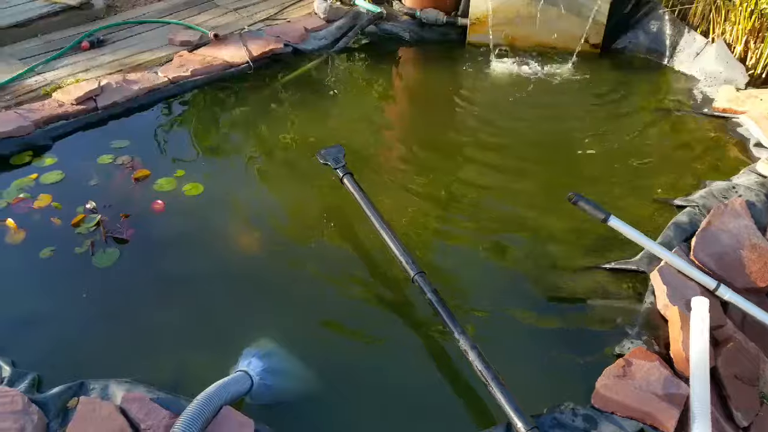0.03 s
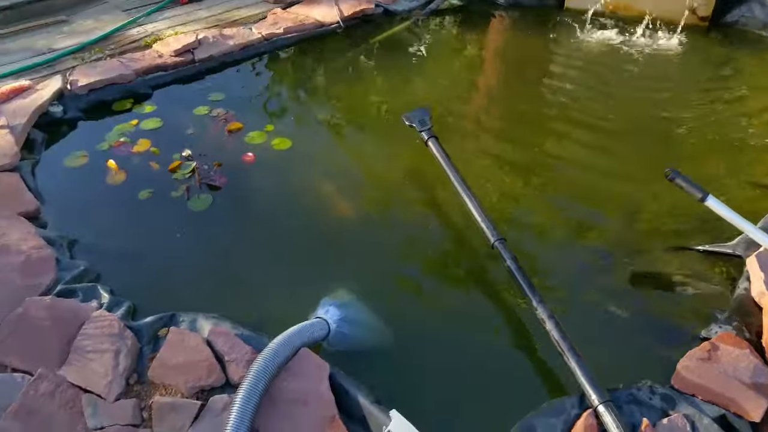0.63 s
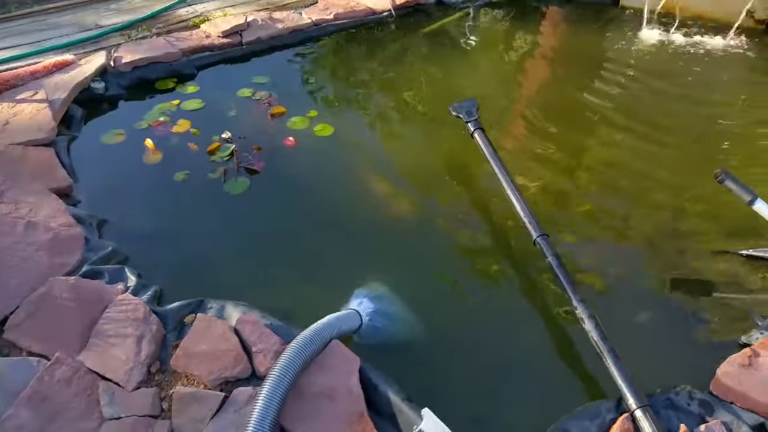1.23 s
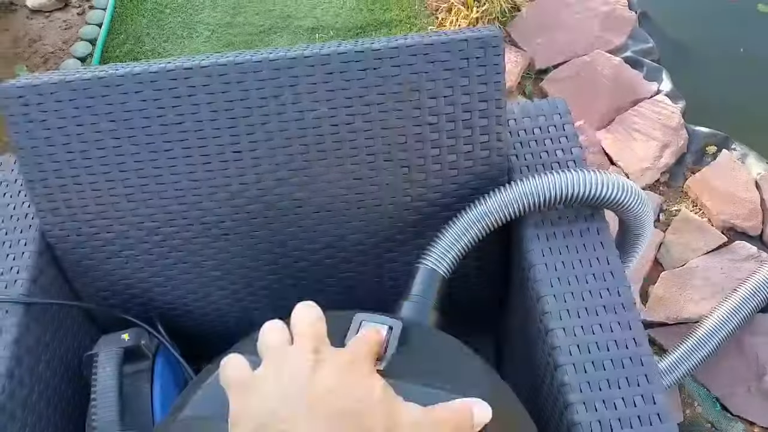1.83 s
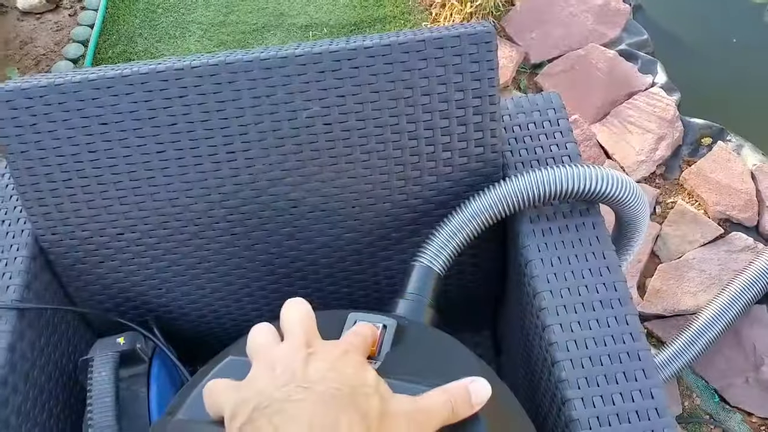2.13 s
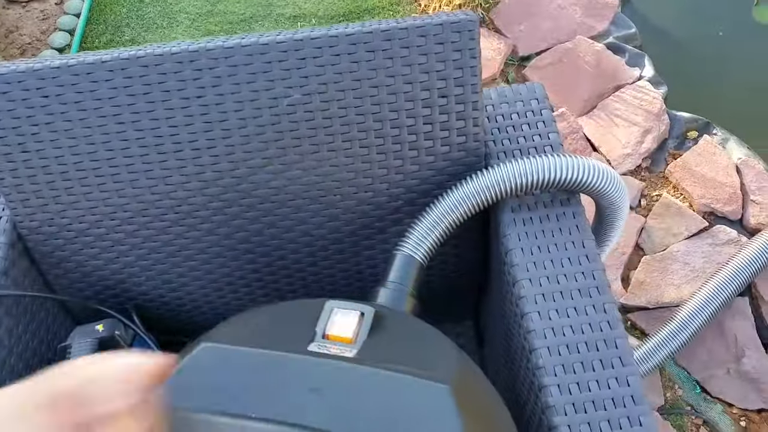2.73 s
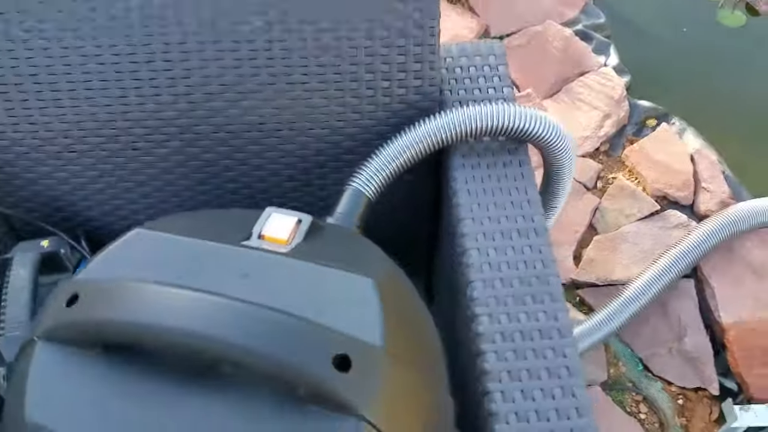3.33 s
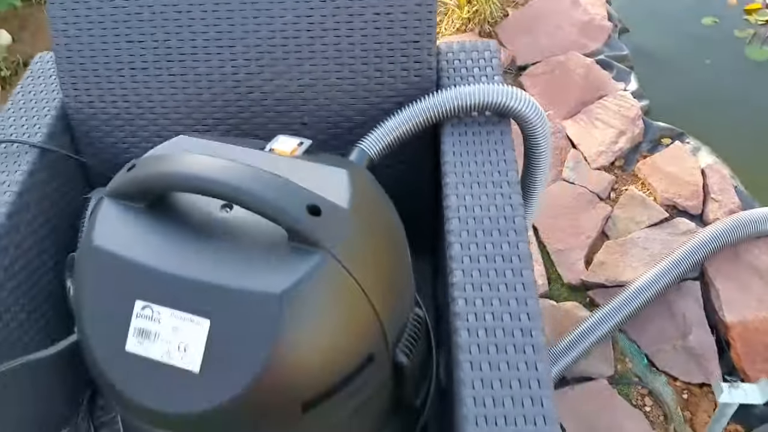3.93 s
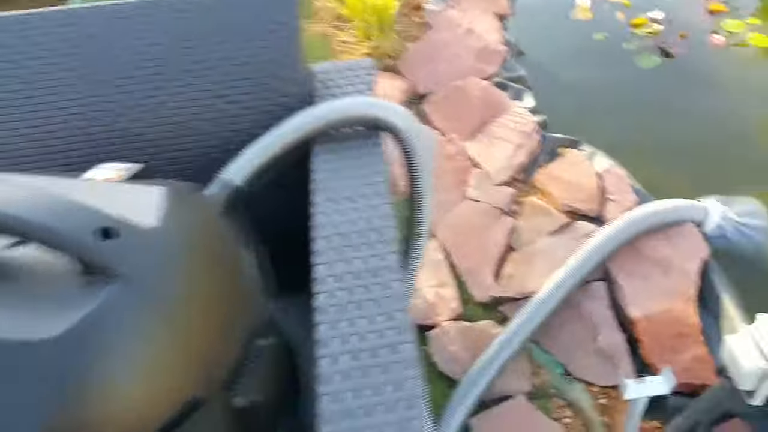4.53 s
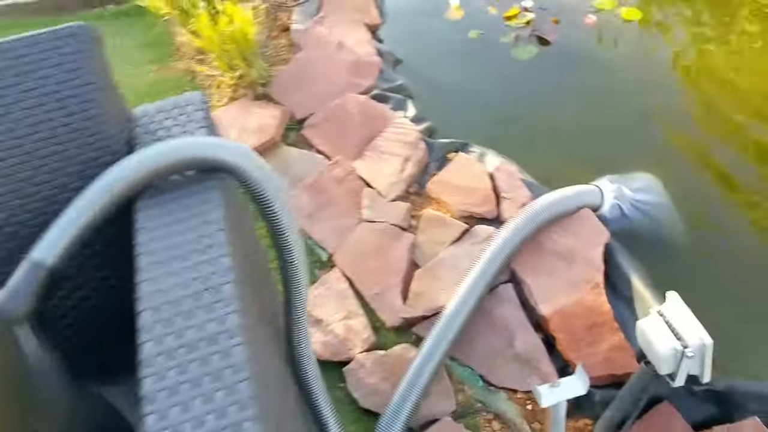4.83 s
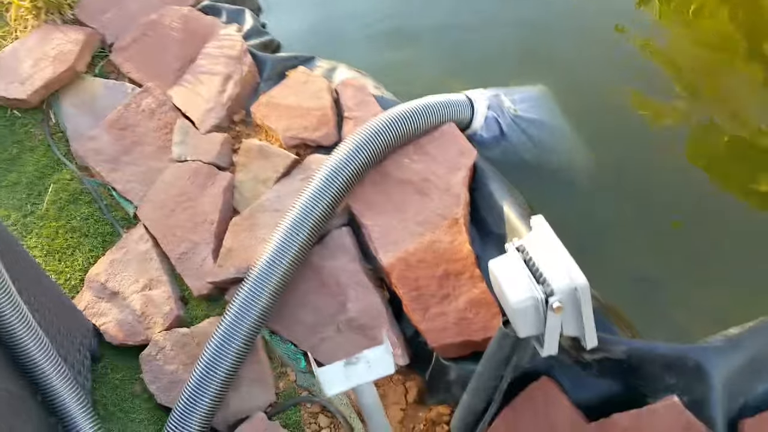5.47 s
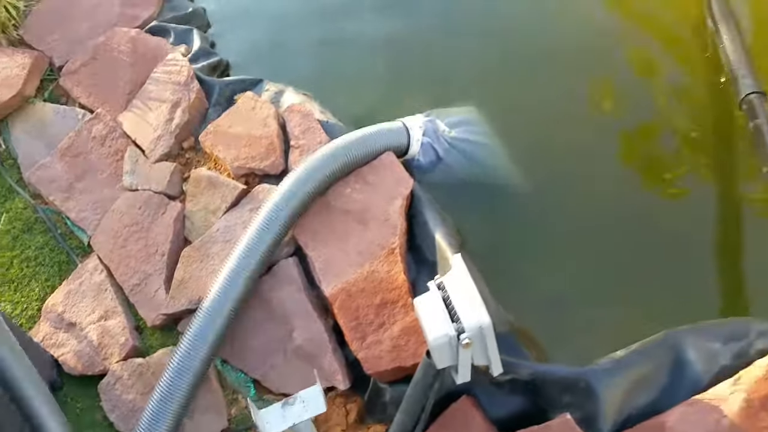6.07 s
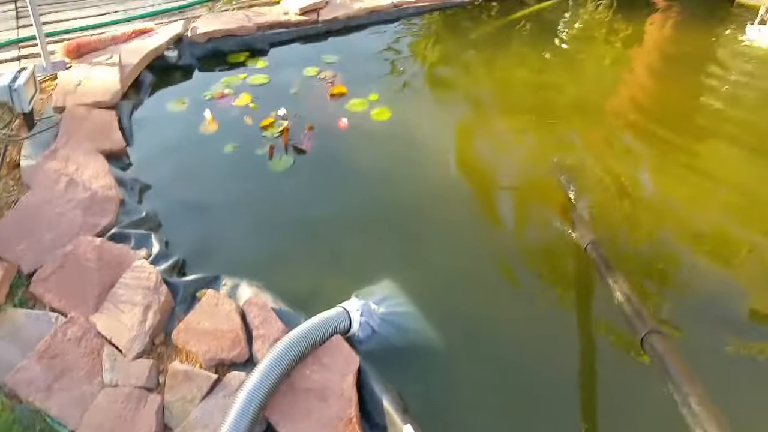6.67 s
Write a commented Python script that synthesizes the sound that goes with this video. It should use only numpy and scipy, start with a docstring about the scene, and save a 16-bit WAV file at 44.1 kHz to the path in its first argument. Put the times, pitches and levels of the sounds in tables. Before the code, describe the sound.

Soft trickling water and light plastic taps, until a vacuum motor spins up into a loud, humming roar that gradually turns duller.

```python
"""Water trickles into a garden pond, each bubble ringing as a damped oscillator. From 1.7 s a hand
fumbles on the plastic lid of a pond vacuum, exciting its modes, and the water abruptly sounds narrower.
At 3.26 s the motor starts with a growl; shaft hum and fan whine glide up with its speed, and turbulent
air roars through tank and hose. Meanwhile a hand-held phone with two microphone ports turns from the
machine towards the pond, out of the treble beam of the vents, and the roar grows duller."""
import sys
import numpy as np
from scipy import signal
from scipy.fft import rfft, irfft
from scipy.io import wavfile
from scipy.ndimage import map_coordinates

SR = 44100
rng = np.random.default_rng(int(sys.argv[2]) if len(sys.argv) > 2 else 0)


def dump_mix(stems):
    """Bounce the given channels to the path in sys.argv[1] as a 16-bit WAV at rate SR."""
    frames = np.atleast_2d(stems).T  # one column per channel
    limited = np.clip(frames, -1, 1)  # hard clip at full scale
    pcm = np.round(limited * 32767).astype(np.int16)
    wavfile.write(sys.argv[1], SR, pcm)


N = 295470
TIME = np.arange(N) / SR
FREQ = np.maximum(np.arange(N // 2 + 1) * SR / N, 1)

# water spectra before and after the change at 1.77 s, of the wash and of the burble: frequency_hz, gain_db
POND_SPECTRUM = [(45, -33), (96, -19), (135, -27), (210, -2.5), (260, -2.5), (365, -14), (445, -3.5),
                 (620, -16), (820, -9.5), (1600, -6), (1880, -3.5), (2150, -3.5), (2800, -7), (4300, -16),
                 (7000, -17), (14400, -25)]
NARROW_SPECTRUM = [(45, -22), (100, -31), (160, -18), (225, -3.5), (370, -4), (465, 6), (620, -14.5),
                   (1500, -4.5), (1950, -6), (2230, -1.5), (2450, -4), (3050, -7.5), (4000, -7), (6000, -22),
                   (10000, -19.5), (14400, -25.5)]
WASH_SPECTRUM = [(500, 1.5), (900, 4.3), (15000, 14.3)]
BURBLE_SPECTRUM = [(20, 20), (500, -1), (750, 10)]
# larger bubbles: start_s, level_db, pitch_hz
LARGE_BUBBLES = [(0.043, -33, 2000), (0.172, -36, 250), (.198, -37.5, 810), (0.208, -32, 1350),
                 (0.235, -32, 1900), (.25, -33, 238), (.314, -36, 820), (0.413, -32, 260),
                 (0.418, -32.5, 1940), (.49, -33, 1890), (.516, -34, 2260), (.625, -34.5, 836),
                 (.641, -33, 1500), (.651, -30, 1650), (1.027, -35.5, 234), (1.205, -37, 1820),
                 (1.241, -35, 1050), (1.297, -37, 1900), (1.44, -35.5, 1120), (1.534, -36, 1000)]
# single drops: start_s, level_db, pitch_hz
DROP_IMPACTS = [(.125, -44, 7200), (.316, -44, 7500), (.35, -45, 9000), (.819, -42, 7100),
                (.884, -41, 10000), (1.141, -43, 9000)]

# modes of the plastic lid: pitch_hz, t60_s, gain_db
LID_MODES = [(1940, 0.07, -1), (2320, 0.13, -4), (2400, 0.26, -4.5), (2660, 0.081, -3.5), (3690, 0.034, -6)]
# ticks on the lid, from fingers and, from 3.24 s, from the motor switching on: start_s, strength_db,
# crack_offset_db, thud_offset_db
LID_TICKS = [(1.671, -50, 9, -10), (1.75, -48, 9, -10), (1.777, -39, -26, 3), (1.899, -32, -18, -5),
             (2.134, -28.5, -4, -3.5), (2.258, -33, -24, -27), (2.38, -31.5, -19, -8),
             (2.508, -29.5, -22, -6), (2.709, -33, -14, -18), (2.814, -36.5, -6, 1), (2.836, -40, -2, -8),
             (2.923, -30, -22, -12), (3.097, -36, -18, -12), (3.161, -38, -5, -4), (3.24, -35, -16, -10),
             (3.263, -27, -22, -7), (3.302, -27, -26, -13)]
# skin and sleeve friction: centre_s, half_width_s, level_db
SLEEVE_RUSTLES = [(1.7, 0.049, -47), (2.855, 0.06, -48.5)]
# rumble of the grip on the phone: time_s, level_db
GRIP_LEVELS = [(2.55, -53), (2.83, -44.5), (3.05, -46), (3.19, -39), (4.0, -41.5), (6.7, -50)]
# hand bumps and the jolt of the starting motor: start_s, level_db, pitch_hz, t60_s
CASING_BUMPS = [(2.789, -33, 90, 0.076), (2.974, -34, 86, .1), (3.013, -40, 100, .07),
                (3.135, -32, 135, 0.13), (3.185, -24.5, 75.4, 0.11), (3.256, -29, 147, 0.059)]

# bearing of the machine: time_s, right_port_lag_ms, hum_pan_db, rush_pan_db, rush_nearness_db
MACHINE_BEARING = [(3.3, 0.092, -3, 1, 6.5), (3.75, 0.061, 12.5, 1.5, -1), (4.05, 0.11, -3.5, 1, 0),
                   (4.35, 0.17, -1.5, 6, 0), (4.7, 0.23, 0.5, 3.5, 1), (5.3, 0.33, 3.5, 4, 4),
                   (5.8, 0.36, 2, 6, 6), (6.25, 0.32, 1.5, 3.5, 4), (6.55, 0.31, 0, 2.5, 1.5)]
# spectra of the air noises and of the growling tank: frequency_hz, gain_db
RUMBLE_SPECTRUM = [(30, -25), (60, -36), (93, 5.5), (120, -8), (160, -4.5), (187, 2), (215, -.5), (310, .5),
                   (420, -1), (540, 3), (680, -3.5), (820, -9), (1300, -29)]
RUSH_SPECTRUM = [(620, 7.5), (880, 1.5), (1080, 2), (1280, 3.5), (1400, -4), (1560, -3), (1780, 0),
                 (2100, 4), (2300, 2.5), (2600, 0.5), (3400, 5.5), (4600, 5), (6600, -4), (7600, -21.5)]
HISS_SPECTRUM = [(5500, 6), (7200, 3.5), (8000, 2.5), (8800, 1.5), (10500, 2.5), (12000, -2), (14500, -9)]
GROWL_SPECTRUM = [(130, 9), (300, 0), (600, -22), (1200, -10), (1800, -20)]
# responses in front of the vents, beside them and at the shaded port: frequency_hz, gain_db
ON_AXIS = [(500, -24), (1100, 5), (1800, 2), (2800, 6), (5200, -3), (6200, -7), (12000, 15)]
OFF_AXIS = [(500, -5), (1100, 1.5), (1800, -1.5), (2800, -6), (5200, -10), (12000, 5)]
PORT_SHADOW = [(3000, 9.5), (7500, 10), (10000, 1.5), (11500, -25), (14500, -1)]
# housing resonances against the rush: pitch_hz, width_hz, gain_db, aside_change_db
HOUSING_MODES = [(1065, 320, -13, -4), (1688, 190, -12, -5.5), (1918, 210, -12, -3), (2460, 62, -8.5, -6.5),
                 (2680, 270, -10, -3.5), (3005, 170, -18.5, 4), (3420, 100, -19.5, 4),
                 (3720, 340, -6, -4.5), (4130, 150, -8, -8), (4620, 240, -22, 0), (5300, 230, -6, -14)]
# singing of hose, tank and housing: centre_s, half_width_s, pitch_hz, width_hz, level_db
AIR_WHISTLES = [(3.626, 0.16, 2650, 252, -31), (3.733, 0.023, 2470, 30, -26), (3.9, .3, 1700, 45, -33),
                (4.333, .15, 1703, 40, -29.5), (4.55, 0.3, 2470, 50, -32), (4.78, 0.3, 3700, 320, -31),
                (5.22, .11, 1950, 80, -28.5), (5.553, 0.41, 378, 90, -32), (5.68, 0.08, 1740, 170, -28),
                (5.82, .026, 1685, 40, -23.5), (5.872, .014, 1715, 25, -22), (5.912, .02, 1705, 30, -22.5),
                (5.97, .04, 1700, 25, -28), (6.42, .2, 335, 140, -32), (6.48, .025, 2470, 25, -28),
                (6.56, .03, 2465, 25, -28.5)]
# gulps in the air stream: centre_s, half_width_s, pitch_hz, level_db, hum_flutter_rad
AIR_GULPS = [(4.312, 0.011, 520, -36, 0.1), (4.668, 0.009, 1020, -16.5, 0), (4.838, 0.007, 1600, -21, 0),
             (5.704, 0.024, 500, -24.5, .9), (6.087, 0.013, 490, -18.5, .9), (6.272, 0.014, 610, -20, .9),
             (6.32, 0.05, 830, -27, 0)]
# shaft hum at the phone, referred to full speed: time_s, level_db
HUM_LEVELS = [(3.6, -32.5), (3.85, -26.5), (4.0, -22), (4.14, -14.5), (4.33, -17.5), (4.65, -14.5),
              (4.85, -12.5), (5.42, -11.5), (5.82, -20), (6.2, -18), (6.55, -11.5)]
# fan casing resonances: pitch_hz, width_hz, gain_db
FAN_CASING_MODES = [(4220, 170, 1), (4730, 120, -4), (5200, 180, -5), (5860, 170, -8), (6110, 190, -9),
                    (6450, 290, -4.5)]
# surges of the whine: centre_s, half_width_s, blade_gain_db, casing_gain_db
WHINE_SURGES = [(3.54, .05, 4, 5), (3.63, .02, 5, 0), (3.755, .045, 11, 4), (3.9, .05, 4, 1),
                (4.035, .04, 8.5, 2), (4.23, .07, 11.5, 7), (4.36, .07, 8, 6), (4.52, .08, 5, 4),
                (4.72, .15, 1, 5), (5.03, .025, 7, 7), (5.118, .03, 13, 9), (5.514, .03, 8, 8),
                (5.75, .09, 10, 7), (5.94, .07, 11, 5), (6.19, .06, 3, 5)]

CHANGE_S = 1.77  # from here on the water abruptly sounds narrower
MOTOR_START_S, FULL_SPEED_HZ, BLADES = 3.257, 596, 11


def undb(db):
    """Amplitude ratio of a level in decibels."""
    return 10 ** (np.asarray(db) / 20)


def unit(x):
    """Normalisation to rms 1."""
    return x / np.sqrt(np.mean(x ** 2))


def curves(table):
    """Linear interpolation of each column over time."""
    times, *columns = np.transpose(table)
    return [np.interp(TIME, times, column) for column in columns]


def swell(centre_s, half_width_s):
    """Gaussian envelope, down to 1/e one half-width from its centre."""
    return np.exp(-((TIME - centre_s) / half_width_s) ** 2)


def fade(start_s, t60_s):
    """Exponential decay of a damped oscillator after a 1 ms attack."""
    age = np.maximum(TIME - start_s, 0)
    return np.minimum(age / .001, 1) * np.exp(-np.minimum(np.log(1000) * age / t60_s, 20))


def noise():
    """Gaussian white noise."""
    return rng.standard_normal(N)


def walk(rate_hz):
    """Slow random fluctuation: low-passed noise of rms 1."""
    return unit(irfft(rfft(noise()) / (1 + (FREQ / rate_hz) ** 4), N))


def band(hz, width_hz):
    """Response of a resonance to random forcing, rms 1."""
    return unit(irfft(rfft(noise()) / (1 + ((FREQ - hz ** 2 / FREQ) / width_hz) ** 2), N))


def diffuse_band(hz, width_hz):
    """A resonance in a diffuse field, uncorrelated at the two ports."""
    return np.array([band(hz, width_hz), band(hz, width_hz)])


def colour(x, spectrum):
    """Spectral shaping, with steep roll-off beyond both ends of the table."""
    hz, db = np.transpose(spectrum)
    gain = undb(np.interp(np.log(FREQ), np.log(hz), db))
    gain = gain * np.minimum(FREQ / hz[0], 1) ** 2 * np.minimum(hz[-1] / FREQ, 1) ** 4
    return irfft(rfft(x) * gain, N)


def delayed(x, ms):
    """Propagation delay, which may vary in time."""
    return map_coordinates(x, [(TIME - ms / 1000) * SR], order=3, mode="nearest")


def pan(x, db):
    """Level difference, left minus right, at constant power."""
    gains = np.array([undb(db + 0 * TIME), np.ones(N)])
    return x * gains / np.sqrt(np.mean(gains ** 2, axis=0))


def ports(x, lag_ms):
    """Path difference: the wave reaches the right port later."""
    return np.array([x, delayed(x, lag_ms)])


def field(source, lag_ms, scattered):
    """Superposition of direct sound and an uncorrelated, scattered share of the power."""
    direct = ports(source(), lag_ms)
    return np.sqrt(1 - scattered) * direct + np.sqrt(scattered) * np.array([source(), source()])


def breeze():
    """Moving air gives faint, slow pressure fluctuations."""
    return diffuse_band(28, 35) * undb(-77 + 2 * walk(3))


def bubble_cloud(low_hz, high_hz, count, cycles, spread_db):
    """Bubble resonance: small bubbles ring at random times, each rising in pitch as it decays."""
    out = np.zeros(N + SR)
    for when, pitch, chance in rng.random((count, 3)):
        hz = low_hz * (high_hz / low_hz) ** pitch
        age = np.arange(int(4 * cycles * SR / hz)) * hz / SR / cycles  # in units of `cycles` periods
        size = undb(spread_db * min(-np.log(1 - chance), 3.5)) * hz / SR
        ring = np.exp(-1.3 * age) * np.sin(2 * np.pi * cycles * age * (1 + 0.021 * age))
        start = int(when * N)
        out[start:start + len(age)] += size * ring
    return unit(out[:N])


def trickle(narrowed, correlation=0.23):
    """Thousands of bubbles under the spout add incoherently, only partly alike at the two ports."""
    lag_ms = np.where(TIME < CHANGE_S, 0.22, 0.39)  # the left port is the later one
    fizz = np.array([bubble_cloud(2510, 12000, count=3500, cycles=16, spread_db=2) for _ in range(2)])
    bubbles = np.array([bubble_cloud(700, 3000, count=2300, cycles=14, spread_db=2.6) for _ in range(2)])
    wash = colour(np.array([noise(), noise()]), WASH_SPECTRUM)
    burble = colour(noise(), BURBLE_SPECTRUM) * undb(2 + 2 * walk(25))
    clusters = sum(diffuse_band(hz, 150) * undb(3 * walk(30)) for hz in (850, 1030, 1900, 2620))
    patter = undb(-2.5) * fizz + undb(-7.5) * (bubbles + wash) + undb(-17.5) * clusters
    left, right = patter * undb(1.2 * walk(35))
    left = correlation * delayed(right, lag_ms) + np.sqrt(1 - correlation ** 2) * left
    flow = np.array([left, right]) + ports(burble, lag_ms)[::-1]
    at_edge = unit(colour(flow, POND_SPECTRUM)) * undb(-39 - 0.67 * TIME)
    narrow = unit(colour(flow, NARROW_SPECTRUM)) * undb(-41)
    return (1 - narrowed) * at_edge + narrowed * narrow


def gurgle(hz=2540):
    """Bubbles of similar size resonate in a narrow band, which swells once."""
    ringing = [bubble_cloud(.9 * hz, 1.1 * hz, count=1800, cycles=20, spread_db=3) for _ in range(2)]
    return np.array(ringing) * undb(-54 + 10 * swell(2.03, .33))


def splashes():
    """Damping grows with frequency: smaller bubbles die sooner, and they throw more spray."""
    spray = np.array([band(1200, 2600), band(1500, 1700)])
    out = 0
    for start_s, db, hz in LARGE_BUBBLES:
        t60_s = .075 * np.sqrt(1000 / hz)
        spray_db = -6 + 2 * np.log2(hz / 1000)
        age = np.clip(TIME - start_s, 0, 1)
        bubble = np.sin(2 * np.pi * hz * age * (1 + 0.048 * age / t60_s))
        out = out + undb(db) * fade(start_s, t60_s) * (bubble + undb(spray_db) * spray)
    return out


def drips():
    """Brief impacts of drops on stone and water radiate broadband ticks."""
    return sum(undb(db) * fade(s, t60_s=.06) * diffuse_band(hz, 5000) for s, db, hz in DROP_IMPACTS)


def water():
    """Superposition of the water sounds, which abruptly change colour and grow narrower at 1.77 s."""
    narrowed = np.clip((TIME - CHANGE_S) / 0.0048, 0, 1)
    sound = trickle(narrowed) + narrowed * gurgle() + splashes() + drips()
    return pan(sound, -2.4 + 2 * narrowed)


def ticks(modes):
    """Impulse response of the lid: each tick excites its modes, a bright crack and a dull thud."""
    start_s, db, crack_db, thud_db = np.transpose(LID_TICKS)
    def decays(levels_db, t60_s):
        """A one-pole filter turns each impulse into an exponential decay."""
        blows = np.zeros(N)
        blows[(start_s * SR).astype(int)] = undb(levels_db)
        return signal.lfilter([1], [1, -np.exp(-np.log(1000) / (t60_s * SR))], blows + 1e-18)
    ringing = sum(ring * decays(db - 2.5, t60_s) for ring, t60_s in modes)
    crack = np.array([band(3700, 9000), band(4200, 12000)]) * decays(db + crack_db, 0.062)
    thud = band(355, 470) * decays(db + thud_db - 4.5, 0.12)
    return ringing + crack + thud


def grip():
    """Structure-borne sound: the grip rumbles through the body of the phone."""
    shaking = field(lambda: band(76, 98), lag_ms=0, scattered=0.5)
    return shaking * undb(curves(GRIP_LEVELS)[0] + 0.56 * walk(21))


def rub(modes):
    """Friction of the sliding palm sustains the lid modes, favouring the least damped."""
    ringing = sum(ring * np.sqrt(t60_s) for ring, t60_s in modes)
    return ringing * undb(-33 + 2 * walk(30)) * swell(3.17, 0.083)


def rustle():
    """Friction of skin and sleeve gives short bursts of treble noise."""
    envelope = sum(undb(db) * swell(s, span) for s, span, db in SLEEVE_RUSTLES)
    return envelope * undb(2.5 * walk(70)) * np.array([band(7800, 7000), band(10000, 7000)])


def bumps():
    """Free vibration: each bump rocks the casing for a few low cycles."""
    return sum(undb(db) * fade(s, t60_s) * np.sin(2 * np.pi * hz * (TIME - s))
               for s, db, hz, t60_s in CASING_BUMPS)


def hand():
    """Contact sounds of the hand, and clicks of the lid as the motor starts; impact and friction excite the
    same lid modes."""
    modes = [(np.array([band(hz, 240), band(hz, 300)]) * undb(db), t60) for hz, t60, db in LID_MODES]
    return ticks(modes) + grip() + rub(modes) + rustle() + bumps()


def speed(pull_share=.418, pull_s=.105, creep_s=.491):
    """Exponential approach to full speed, 1: a quick pull, then a slow creep against the air load."""
    age = np.maximum(TIME - MOTOR_START_S, 0)
    return 1 - pull_share * np.exp(-age / pull_s) - (1 - pull_share) * np.exp(-age / creep_s)


def turned(aside_lag_ms=0.33):
    """Bearing from the port lag: 0 in front of the vents, 1 beside the machine."""
    return np.clip(curves(MACHINE_BEARING)[0] / aside_lag_ms, 0, 1)


def driven(db, power, aside_db):
    """Gain as a power law of shaft speed, changed by aside_db beside the machine."""
    return undb(db + aside_db * turned()) * np.maximum(speed(), 1e-9) ** power


def growl(pulse_hz=100):
    """Forced vibration: the starting current shakes tank and lid twice per mains cycle, then eases."""
    pulses = unit(1 + np.cos(2 * np.pi * pulse_hz * (TIME - MOTOR_START_S)) / 2)
    tank = unit(colour(noise(), GROWL_SPECTRUM)) * undb(-32.5)
    lid = unit(sum(diffuse_band(hz, 200) * undb(db) for hz, _, db in LID_MODES)) * undb(-37)
    return (tank + lid) * pulses * fade(MOTOR_START_S, t60_s=.9)


def rumble(lag_ms):
    """Turbulence drives the low resonances of tank and hose; the level dips once, briefly."""
    flow = unit(colour(field(noise, lag_ms, scattered=0.056), RUMBLE_SPECTRUM))
    change_db = -8 * swell(6.09, 0.17) + 0.76 * walk(37)
    return pan(flow * driven(-23 + change_db, power=0.9, aside_db=-3.5), 1.9)


def jet():
    """Comb filtering: the seat back echoes the jet over a path that grows as the phone draws away."""
    direct = noise()
    return direct + .35 * delayed(direct, ms=3.4 + .9 * (TIME - MOTOR_START_S))


def rush(lag_ms, aside):
    """Directivity: air rushes through the resonant housing, and the vents beam its treble forward."""
    flow = unit(colour(field(jet, lag_ms, scattered=0.73), RUSH_SPECTRUM))
    for hz, width, db, aside_db in HOUSING_MODES:
        flicker_db = 1.5 * walk(14) + 1.5 * walk(70)
        resonance = field(lambda: band(hz, width), lag_ms, scattered=0.36)
        flow = flow + resonance * undb(db + aside_db * aside + flicker_db)
    heard = (1 - aside) * colour(flow, ON_AXIS) + aside * colour(flow, OFF_AXIS)
    return heard * driven(-16.5, power=2.3, aside_db=-6)


def waver(hz, width_hz):
    """Random frequency modulation of a tone, rms 1."""
    return np.sqrt(2) * np.sin(2 * np.pi * np.cumsum(hz + width_hz / 2 * walk(width_hz)) / SR)


def whistles():
    """Resonances of hose, tank and housing radiate all round and reach both ports nearly together."""
    tones = sum(waver(hz, width) * undb(db) * swell(s, span) for s, span, hz, width, db in AIR_WHISTLES)
    return ports(tones * undb(2 * walk(30)), lag_ms=0.13)


def gulps(lag_ms):
    """Transients in the air stream knock as short bursts of band noise."""
    return ports(sum(band(hz, 280) * undb(db) * swell(s, span) for s, span, hz, db, _ in AIR_GULPS), lag_ms)


def hiss(lag_ms, aside, eddies):
    """Acoustic shadow: the vents hiss and sizzle, and turning shades the left port from the top treble."""
    flow = unit(colour(field(noise, lag_ms, scattered=0.91), HISS_SPECTRUM))
    flow = flow * driven(-18, power=2.34, aside_db=-19)
    sizzle = np.array([band(13500, 3500), band(12500, 3500)]) * driven(-33, power=2.1, aside_db=-21)
    left, right = (flow + sizzle) * eddies
    return np.array([(1 - aside) * left + aside * colour(left, PORT_SHADOW), right * undb(7.15 * aside)])


def air():
    """Flow noise of the machine; the same eddies modulate rush and hiss."""
    lag_ms, _, rush_pan_db, nearness_db = curves(MACHINE_BEARING)
    aside = turned()
    eddies = undb(0.6 * walk(15.4) + 0.71 * walk(160))
    low = rumble(lag_ms)
    middle = rush(lag_ms, aside) * undb(nearness_db) * eddies + whistles() + gulps(lag_ms)
    return low + pan(middle, rush_pan_db) + hiss(lag_ms, aside, eddies)


def commutator(angle, segments=22):
    """Periodic contact: the commutator buzzes briefly during the first turns."""
    buzz = np.sin(segments * angle + 1.1 * walk(250))
    return buzz * undb(-34 + 1.8 * walk(70)) * swell(3.32, .03)


def stall(angle, lag_ms, speed_share=.324):
    """Rotating stall: a cell circles the fan slower than the shaft and drones below the hum."""
    drone = np.sqrt(2) * np.sin(speed_share * angle + 1.3 * walk(14)) * undb(2 * walk(12))
    return pan(ports(drone, lag_ms), 3.4) * undb(-30.5) * swell(4.52, 0.97)


def whine(angle, shaft_hz, reach_hz=400):
    """The blade-passing tone, roughened by turbulence, excites each casing resonance that it nears."""
    blade_phase = BLADES * angle + .6 * walk(40) + .45 * walk(250)
    # each port receives the tone by its own shifting paths
    tone = np.array([np.sin(blade_phase + .6 * walk(5)) for _ in range(2)]) * undb(3 * walk(35))
    tone_db = sum(db * swell(s, span) for s, span, db, _ in WHINE_SURGES)
    casing_db = sum(db * swell(s, span) for s, span, _, db in WHINE_SURGES) + 1.5 * walk(35)
    casing = sum(diffuse_band(hz, width) * undb(db) * np.exp(-((BLADES * shaft_hz - hz) / reach_hz) ** 2)
                 for hz, width, db in FAN_CASING_MODES)
    return (casing * driven(-23.5 + casing_db, power=2.4, aside_db=-5.5)
            + tone * driven(-30 + tone_db, power=1.5, aside_db=-5))


def hum(angle, shaft_hz, mount_hz=297, tank_hz=640):
    """Unbalance forces the housing once a turn, most strongly near resonance; some gulps shake the phase."""
    flutter_rad = 0.047 + sum(rad * swell(s, span) for s, span, _, _, rad in AIR_GULPS)
    phase = angle + flutter_rad * walk(41)
    mount_gain = undb(-15) / np.hypot(1, ((shaft_hz - mount_hz) / 80) ** 7)
    # the second harmonic swells as it sweeps through a resonance of the tank
    second_gain = undb(-37) + undb(-16.5) / (1 + ((2 * shaft_hz - tank_hz) / 50) ** 2)
    tone = np.sqrt(2) * (np.sin(phase) + second_gain * np.sin(2 * phase))
    running_gain = undb(curves(HUM_LEVELS)[0]) * speed()
    return tone * np.hypot(mount_gain, running_gain) * undb(walk(22))


def rotor():
    """Rotational orders: hum, buzz, whine and drone all follow one shaft angle and glide up together."""
    shaft_hz = FULL_SPEED_HZ * speed()
    angle = 2 * np.pi * np.cumsum(shaft_hz * (1 + 0.00078 * walk(14.2))) / SR
    lag_ms, hum_pan_db, _, _ = curves(MACHINE_BEARING)
    running = np.clip((TIME - MOTOR_START_S) / 0.018, 0, 1)
    shaft = pan(ports(hum(angle, shaft_hz), 1.27 * lag_ms), hum_pan_db)
    return running * (shaft + commutator(angle) + whine(angle, shaft_hz) + stall(angle, lag_ms))


def scene():
    """Linear superposition of garden, hand and machine at the two ports."""
    return water() + breeze() + hand() + growl() + rotor() + air()


def record(dry, cutoff_hz=14600):
    """Band limiting: the phone's steep low-pass filter cuts the top of the treble."""
    return signal.sosfilt(signal.ellip(10, .2, 80, cutoff_hz, fs=SR, output="sos"), dry)


dry = scene()
out = record(dry)
dump_mix(out)
```